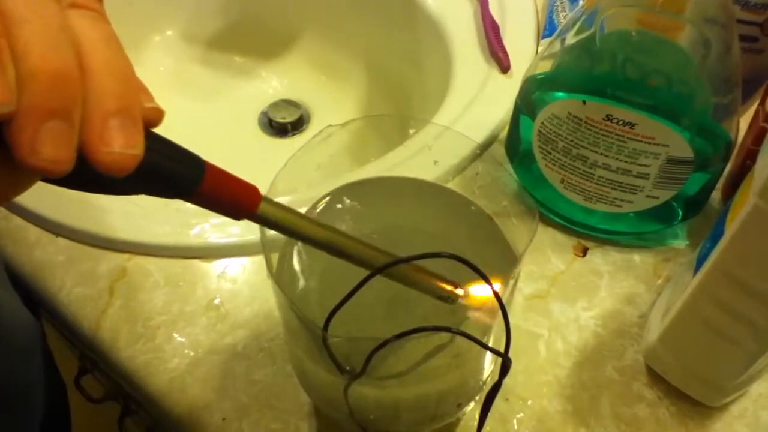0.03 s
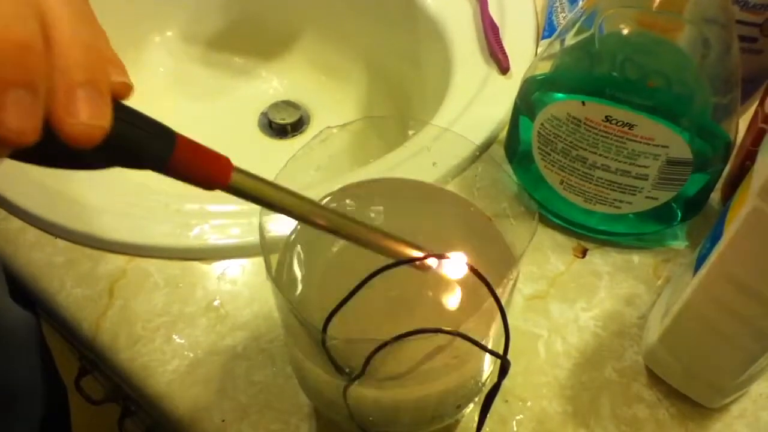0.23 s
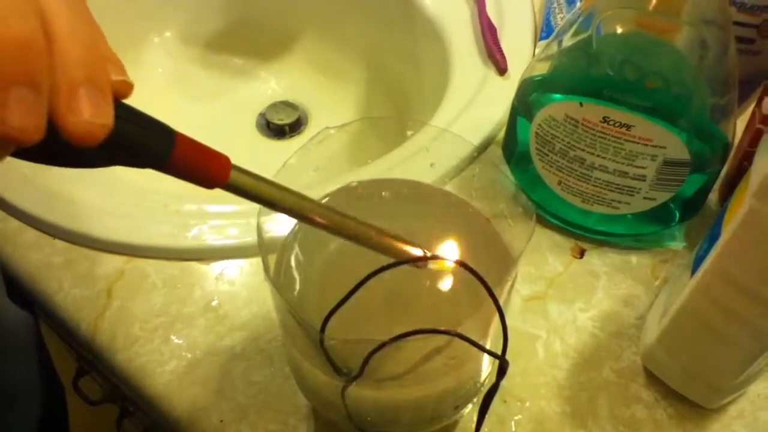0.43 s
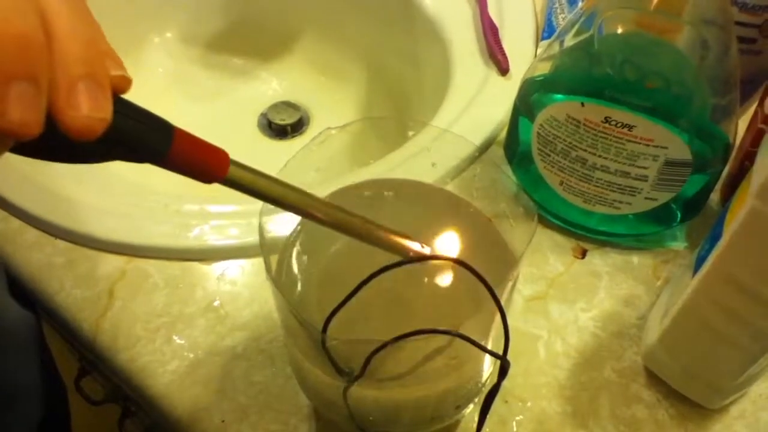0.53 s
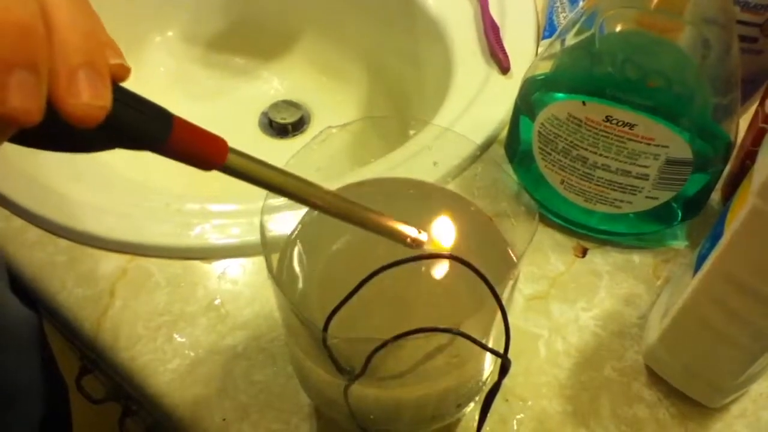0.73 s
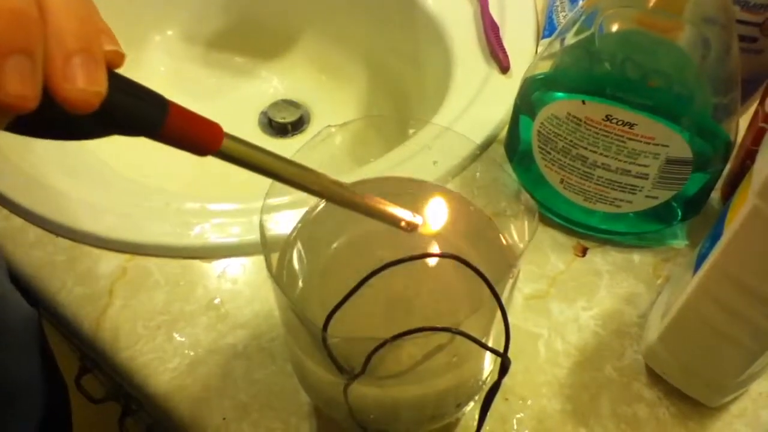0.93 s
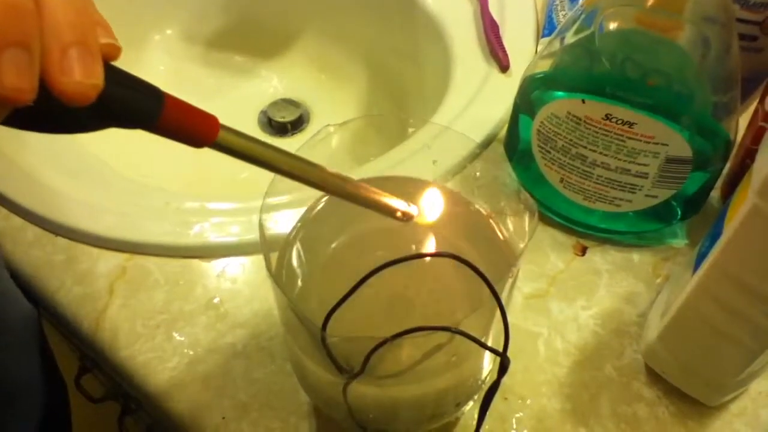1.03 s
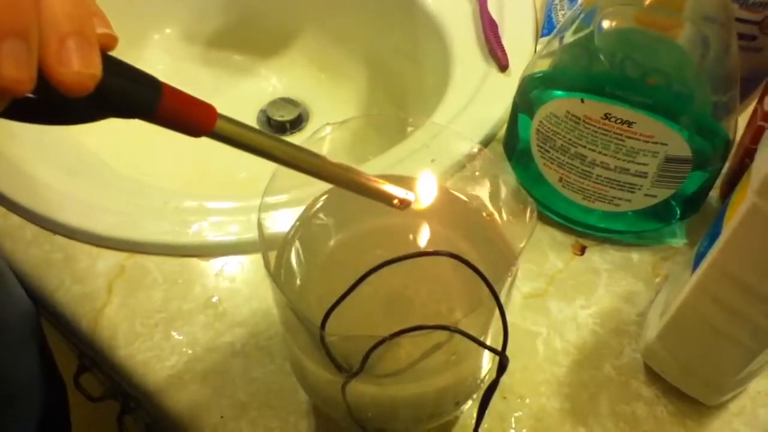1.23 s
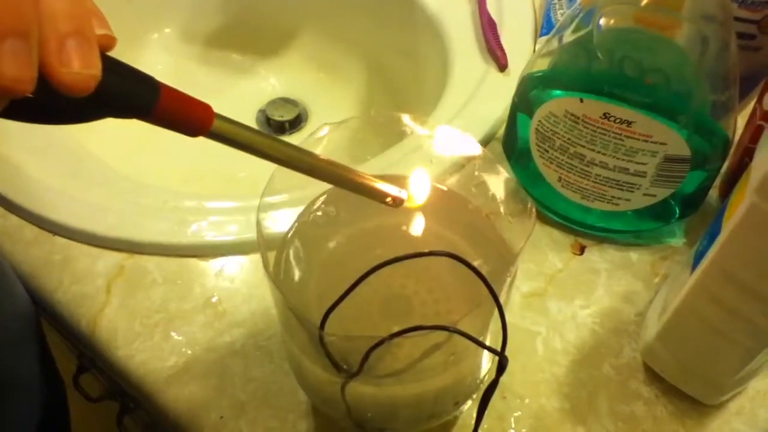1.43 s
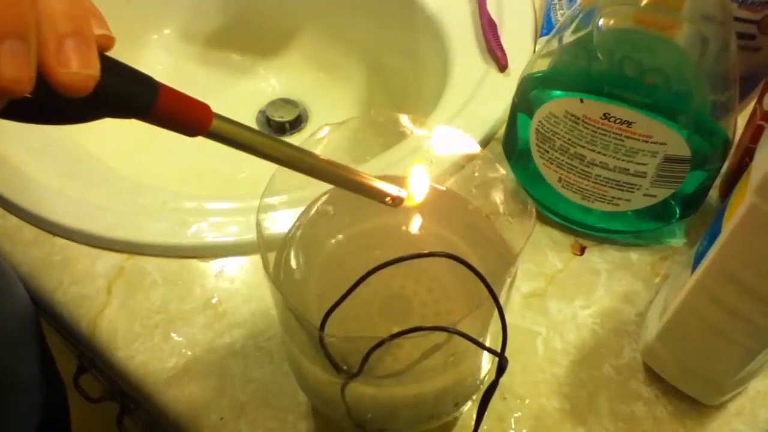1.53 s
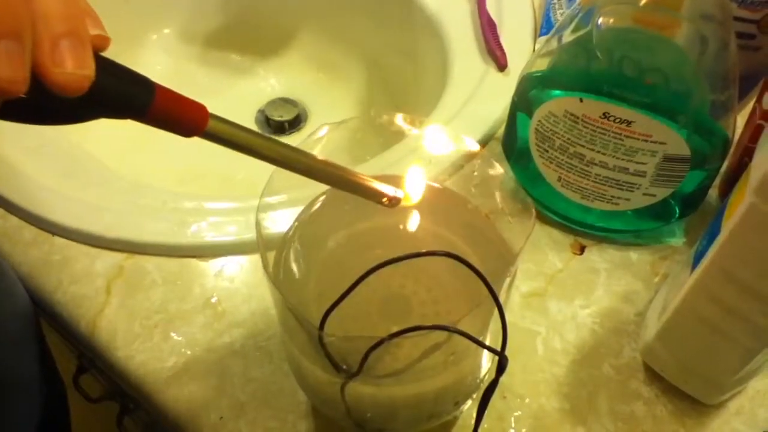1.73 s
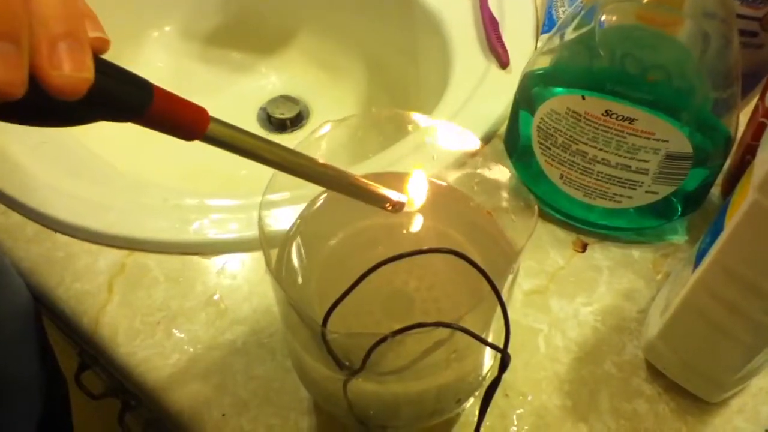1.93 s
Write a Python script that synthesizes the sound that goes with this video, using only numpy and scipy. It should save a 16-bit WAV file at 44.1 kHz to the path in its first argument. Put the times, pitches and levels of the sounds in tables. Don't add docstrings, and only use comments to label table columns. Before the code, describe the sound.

Igniting gas bubbles pop in a plastic cup, close up in a tiled bathroom. The tail of an earlier pop and two weak pops open the first 0.03 s; a loud, sharp crack hits at 0.22 s, ringing for about half a second. Room hiss dips, then slowly creeps back. Tiny bubble ticks come at 0.4-0.7 and 1.4-1.7 s, soft low flame puffs from 1.4 s, a lighter click at 1.9 s.

```python
import sys
import numpy as np
from scipy import signal
from scipy.io import wavfile
from scipy.ndimage import uniform_filter1d

SR = 44100
rng = np.random.default_rng(int(sys.argv[2]) if len(sys.argv) > 2 else 0)


def volts(x):
    e = np.asarray(x, float) / 20
    return 10 ** e


def wav_record(signal):
    frames = np.transpose(np.atleast_2d(signal))
    bounded = np.clip(frames, -1, 1)
    quanta = np.round(bounded * 32767).astype(np.int16)
    wavfile.write(sys.argv[1], SR, quanta)


N = 88200
BANDS_HZ = 28 * 2 ** np.arange(0, 9.6, .5)


def table(rows, col, hz):
    rows = np.array(rows)
    return np.interp(np.log(hz), np.log(rows[:, 0]), rows[:, col])


def highpass(x, hz):
    return signal.sosfilt(signal.butter(4, hz, "highpass", fs=SR, output="sos"), x)


def band(hz, width_hz=None):
    if width_hz is None:
        edges_hz = [hz / 2 ** .25, min(hz * 2 ** .25, SR / 2.2)]
    else:
        edges_hz = [hz - width_hz / 2, hz + width_hz / 2]
    sos = signal.butter(2, edges_hz, "bandpass", fs=SR, output="sos")
    return signal.sosfilt(sos, rng.standard_normal(N))


def walk(rate_hz):
    hold = int(SR / rate_hz)
    steps = np.repeat(rng.standard_normal(N // hold + 1), hold)
    return 1.3 * uniform_filter1d(uniform_filter1d(steps, hold), hold)[:N]


def ring(x, modes):
    out = 0
    for hz, db, t60_s in modes:
        r = np.exp(-np.log(1000) / (t60_s * SR))
        w = 2 * np.pi * hz / SR
        out = out + volts(db) * signal.lfilter([0, r * np.sin(w)], [1, -2 * r * np.cos(w), r * r], x)
    return out


def grains(rows):
    size, glide = 4000, 0.036
    out = np.zeros(N + size)
    for s, db, hz, cycles in rows:
        c = np.arange(size) * hz / SR
        age = c / cycles
        tone = np.sin(2 * np.pi * c * (1 + glide * age / 2))
        swell = age * 4 * np.exp(1 - age * 4)
        i = int(s * SR)
        out[i:i + size] += volts(db) * tone * swell
    return out[:N]


# (frequency [Hz], density [dB per Hz])
AIR = [(15, -42), (25, -16.5), (64, 3.5), (253, -1), (666, -10.5), (722, -10), (1450, -14), (7910, -16),
       (15500, -19.5)]


def air():
    level_db, flutter_db, flutter_hz, hiss_flicker_db = -55.5, 1.1, 500, .3
    gust = walk(22) + walk(60)
    out = 0
    for hz in BANDS_HZ:
        flutter = flutter_db * gust / (1 + (hz / flutter_hz) ** 2)
        out = out + band(hz) * volts(table(AIR, 1, hz) + flutter + hiss_flicker_db * walk(9))
    return out * volts(level_db) / np.std(out)


# (frequency [Hz], level [dB], t60 [s])
ROOM = [(280, -12.5, 0.31), (654.3, 10, .42), (1215, -1.5, 0.4), (2260, 2, 0.42), (3252, -7, 0.43),
        (5500, 1, 0.71), (8300, 5, 0.15), (14100, -2.5, 0.52)]
# (frequency [Hz], width [Hz], level [dB], t60 [s])
BASIN = [(2000, 390, 11, 0.5), (1125, 350, 0, 0.533), (2394, 176, 3.5, 0.55), (3023, 160, -1.5, 0.33),
         (3880, 370, 5, .45), (8500, 2400, 8, 0.33), (12560, 2200, 0.5, .15)]


def room(x):
    level_db, rise_s = -35, 0.002
    t = np.arange(N) / SR
    tail = 0
    for hz in BANDS_HZ[6:]:
        tail = tail + band(hz) * volts(table(ROOM, 1, hz) - 60 * t / table(ROOM, 2, hz))
    for hz, width_hz, db, t60_s in BASIN:
        tail = tail + band(hz, width_hz) * volts(db - 60 * t / t60_s)
    return signal.fftconvolve(x, tail * volts(level_db) * (1 - np.exp(-t / rise_s)) ** 2)[:N]


# (frequency [Hz], level [dB], t60 [s])
CUP = [(954, -22, 0.038), (1164, -9, .015), (1300, -18, 0.029), (1500, -9.5, .012), (2278, -10, 0.012),
       (2530, -7, 0.015)]
# (frequency [Hz], level [dB], t60 [s])
CUP_CROSS = [(3150, -14.5, 0.0054), (3551, -6, 0.03), (3936, -5.5, 0.0046), (4460, -15.5, .01),
             (4690, -24, .02)]
# (frequency [Hz], level [dB], t60 [s])
THUMP = [(221, -45.5, 0.063), (348, -41.5, .1), (470, -38, 0.095), (574, -35.5, .06)]
# (frequency [Hz], density [dB per Hz])
CRACK = [(4000, -8), (5400, -8), (6300, -3.5), (8500, 2.5), (10300, -14), (12500, -1), (14500, -10),
         (17000, -29.5)]


def ignite(rows):
    mouth_hz = 786.7
    crack_db, crack_s, crack_rise_s = -17.5, 0.0032, .0003
    t = np.arange(N) / SR
    push, burst = 0, 0
    for s, db, push_ms in rows:
        push = push + volts(db) * np.exp(-((t - s) * 2000 / push_ms) ** 2) / (push_ms * 40)
        age_s = np.abs(t - s)
        envelope = (t > s) * (np.exp(-age_s / crack_s) - np.exp(-age_s / crack_rise_s))
        burst = burst + volts(db) * (0.12 / push_ms) ** 2 * envelope
    noise = sum(band(hz) * volts(table(CRACK, 1, hz)) for hz in BANDS_HZ[14:])
    cup = highpass(ring(push, CUP_CROSS) - ring(push, CUP), mouth_hz)
    thump = highpass(ring(push, THUMP), 170)
    return cup + thump + volts(crack_db) * highpass(burst * noise, 4200)


def earlier_pop():
    level_db, lead = -34, int(.03 * SR)
    tail = room(ignite([(.001, level_db + 16, 0.23)]))
    return np.pad(tail[lead:], (0, lead))


# (time [s], level [dB], push [ms])
POPS = [
    (.0075, -24.5, 0.076),
    (.0302, -22, .4),
    (.2130, -22.5, 0.071),
    (.2214, -5, 0.088),
]


def pops():
    return ignite(POPS)


# (delay [ms], level [dB])
ECHOES = [(.85, -12.5), (2.1, -16.5), (3.0, -10), (4.2, -11), (5.2, -19)]


def near_echoes(x):
    i = np.arange(N)
    return x + sum(volts(db) * np.interp(i - ms * SR / 1000, i, x) for ms, db in ECHOES)


# (time [s], level [dB], pitch [Hz], length [cycles])
PUFFS = [(1.418, -56.5, 200, 4.6), (1.458, -57.5, 200.6, 4.2), (1.484, -56.5, 240, 5),
         (1.523, -59, 254, 3.4), (1.750, -57, 166, 2.9), (1.878, -55.5, 130, 7.4), (1.892, -54.5, 146, 6),
         (1.981, -61.5, 198, 6.1), (1.992, -79, 262, 4), (.04, -69, 133, 3.4)]


def puffs():
    return grains(PUFFS)


# (time [s], level [dB], pitch [Hz], length [cycles])
BUBBLES = [(.124, -46, 9850, 6), (.055, -51, 7900, 17), (.400, -48.5, 13100, 2.2), (.497, -54, 7600, 16),
           (.531, -51, 9520, 3.1), (.554, -47.5, 8900, 33), (.561, -51, 8900, 17), (.623, -62, 6500, 2.5),
           (.662, -37.5, 9800, 1.6), (1.444, -45, 6800, 4.2), (1.452, -50, 6770, 6.8),
           (1.545, -54.5, 5710, 12), (1.548, -50, 6500, 18), (1.570, -49, 6900, 14),
           (1.583, -53.5, 7640, 32), (1.595, -49.5, 7300, 30), (1.58, -56, 5500, 21),
           (1.610, -35.5, 12520, 2), (1.623, -57.5, 9000, 1.6), (1.650, -48, 8300, 5),
           (1.691, -52, 8500, 16)]


def bubbles():
    return grains(BUBBLES)


# (delay [ms], level [dB])
SNAPS = [
    (0, 4),
    (.45, -4),
    (1.1, -4),
    (1.7, -8.5),
]
# (frequency [Hz], level [dB], t60 [s])
LIGHTER = [(3190, -3, 0.011), (3900, -18.5, 0.015), (4780, -4.5, 0.018), (5300, -1, 0.0054),
           (6460, -6.5, 0.0093), (7670, -6, 0.012), (8500, -5.5, 0.018), (9400, -6, 0.0075),
           (10200, -9, .008), (10900, -7, 0.0057)]


def lighter():
    start_s, level_db, rattle_db, rattle_s = 1.9058, -35.5, -20.5, 0.0066
    t = np.arange(N) / SR - start_s
    hits = volts(rattle_db) * rng.standard_normal(N) * (t > 0) * np.exp(-np.abs(t) / rattle_s)
    for k, (ms, db) in enumerate(SNAPS):
        hits += (-1) ** k * volts(db) * np.exp(-((t - ms / 1000) * SR / 1.5) ** 2)
    modes = sum((-1) ** k * ring(hits, [mode]) for k, mode in enumerate(LIGHTER))
    return volts(level_db) * highpass(highpass(modes, 2900), 2950) / 2


def scene():
    lighter_wet_db = -10.5
    earlier = earlier_pop()
    cup, click = pops(), lighter()
    wet = room(cup + volts(lighter_wet_db) * click)
    return (near_echoes(cup) + click + wet + earlier + bubbles() + puffs() + air())[None]


def band_limit(x):
    return signal.sosfilt(signal.butter(12, 15930, fs=SR, output="sos"), x)


# (time [s], length [s])
DROPOUTS = [
    (.197, .013),
    (1.890, .014),
]


def record(dry):
    before_db, duck_s, duck_db, hold_s, recover_db_s = -2, .2275, -8.5, 0.294, 3.5
    dropout_share, dropout_hz, top_hz = .65, 2800, 15600
    t = np.arange(N) / SR
    after_db = duck_db + recover_db_s * np.clip(t - duck_s - hold_s, 0, None)
    gain_db = uniform_filter1d(np.where(t < duck_s, before_db, after_db), 60)
    gap = uniform_filter1d(sum(1. * (t > s) * (t < s + length_s) for s, length_s in DROPOUTS), 90)
    treble = signal.sosfiltfilt(signal.butter(4, dropout_hz, "highpass", fs=SR, output="sos"), dry)
    leveled = (dry - dropout_share * gap * treble) * volts(gain_db)
    mix = signal.sosfilt(signal.butter(12, top_hz, fs=SR, output="sos"), leveled)
    return band_limit(mix)


dry = scene()
out = record(dry)
wav_record(out)
```